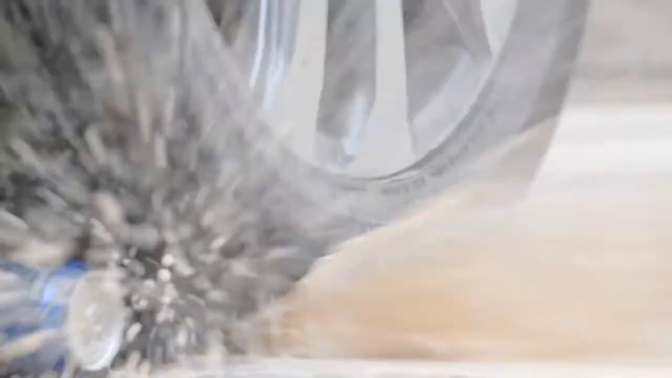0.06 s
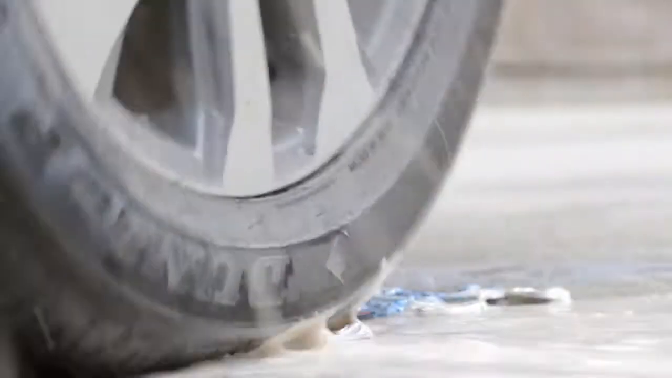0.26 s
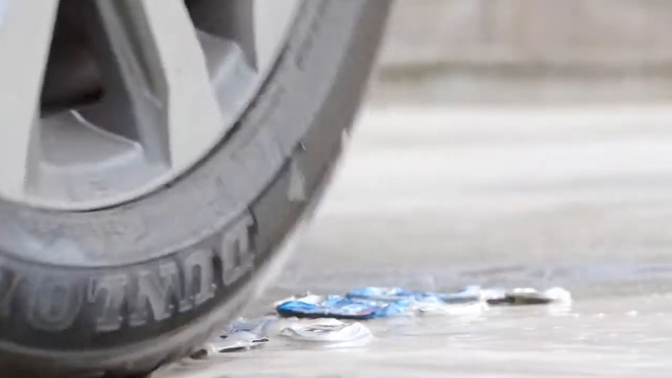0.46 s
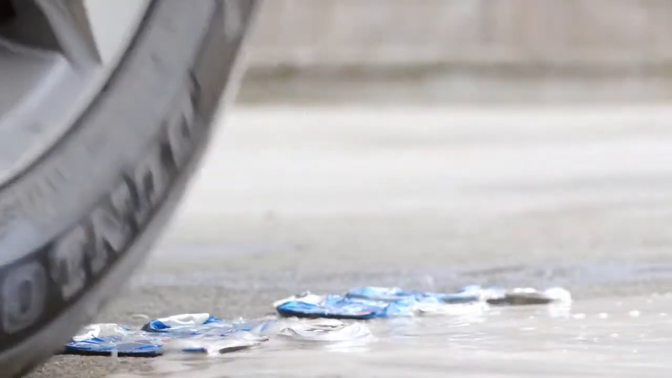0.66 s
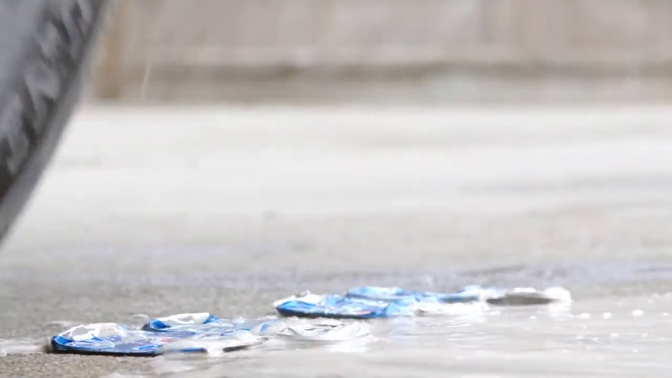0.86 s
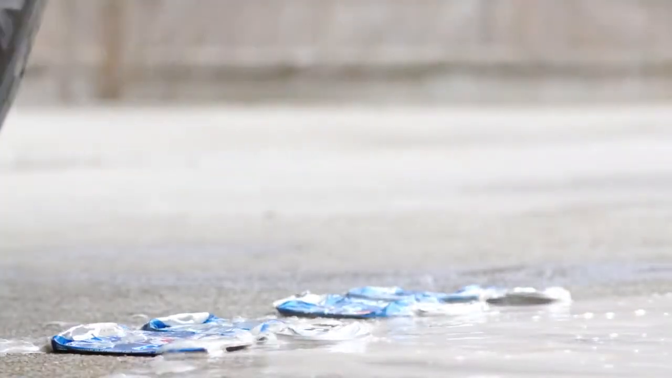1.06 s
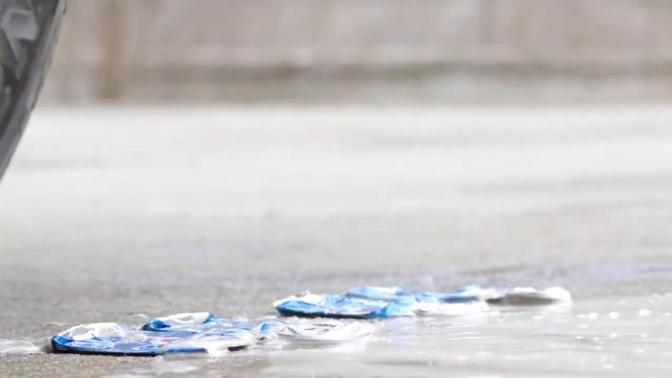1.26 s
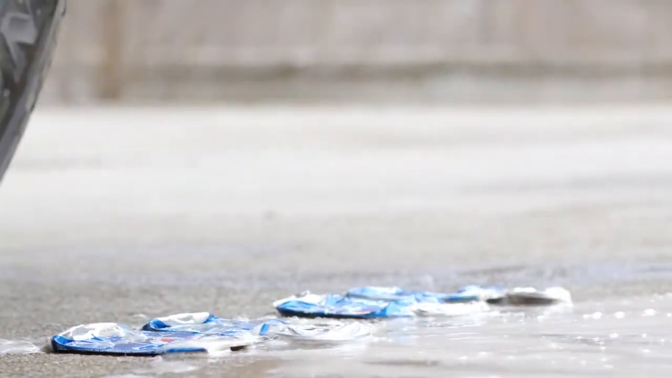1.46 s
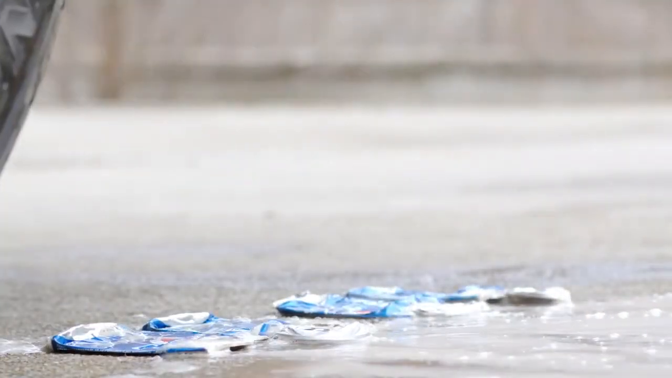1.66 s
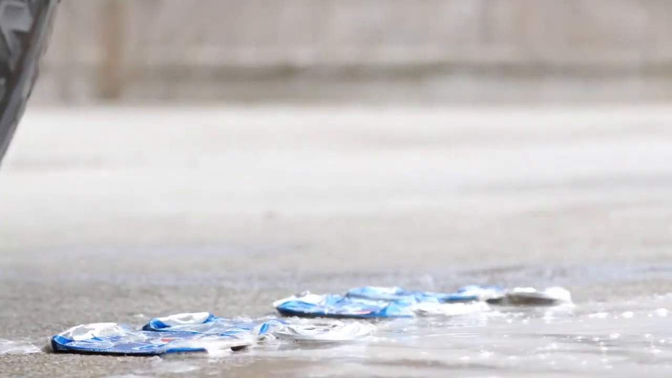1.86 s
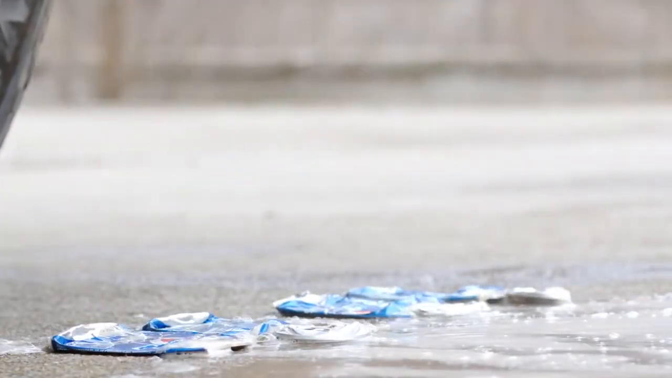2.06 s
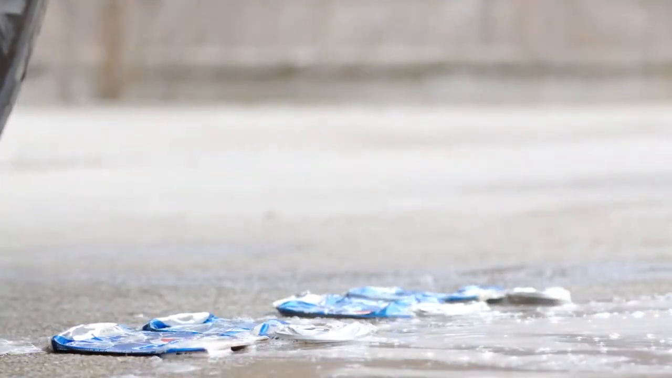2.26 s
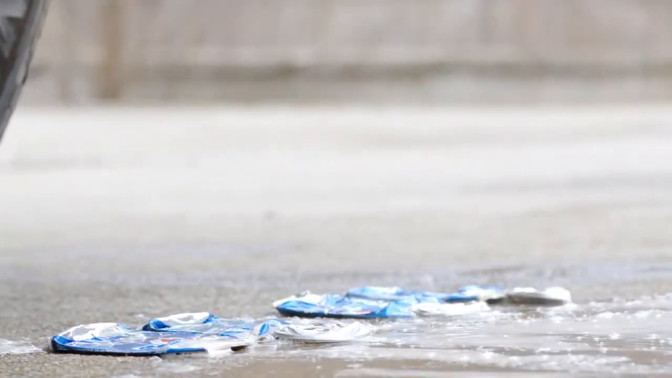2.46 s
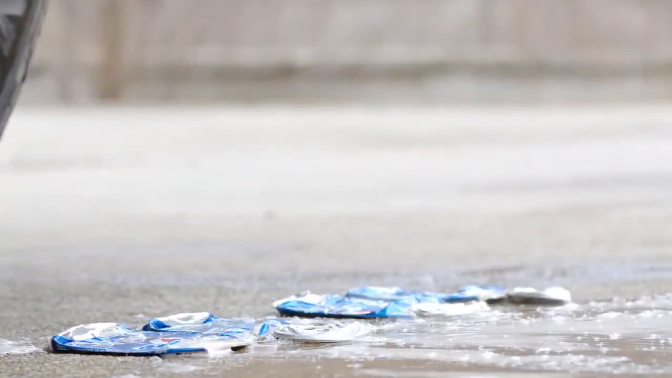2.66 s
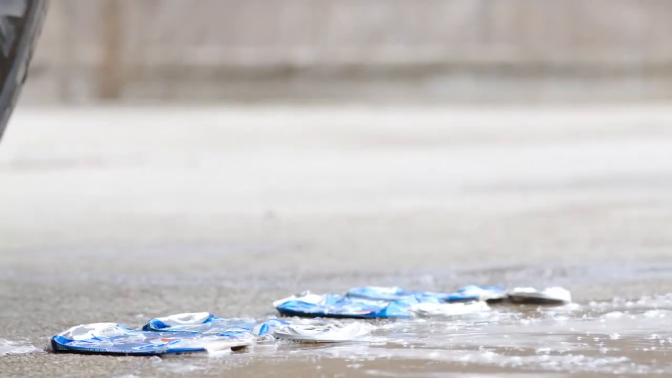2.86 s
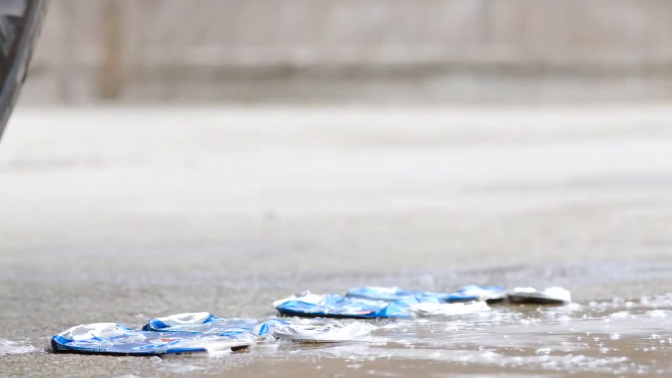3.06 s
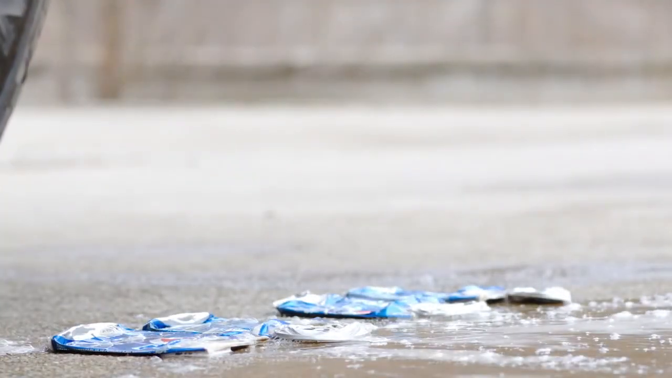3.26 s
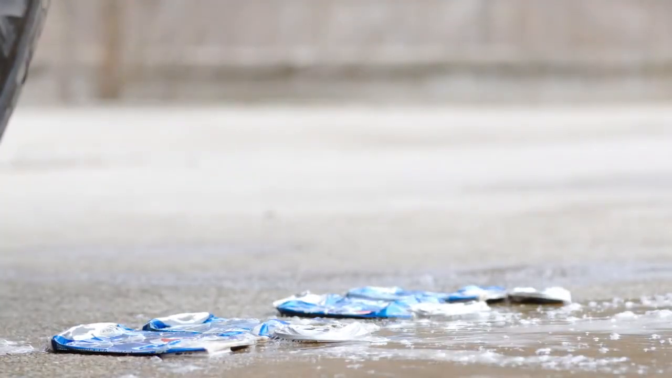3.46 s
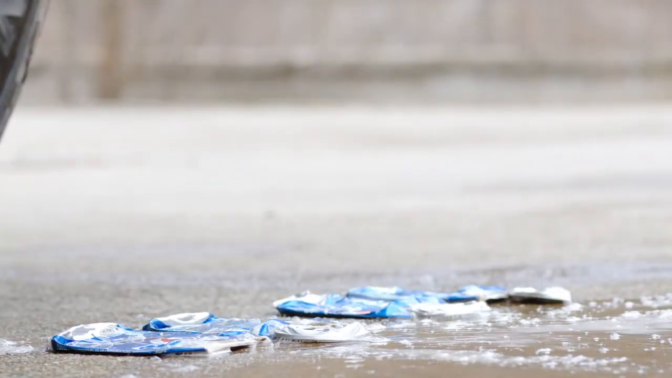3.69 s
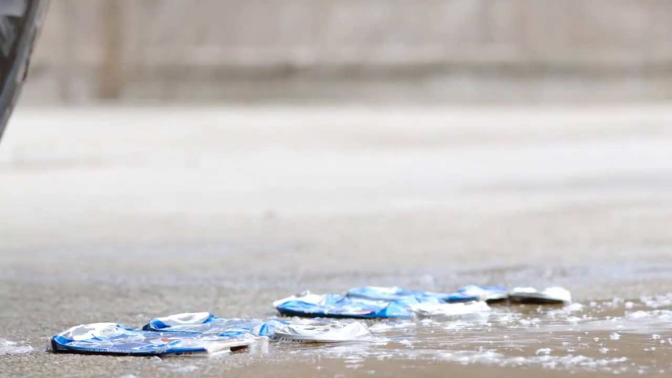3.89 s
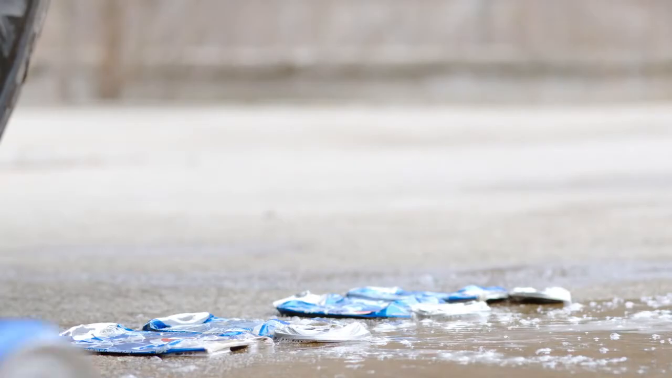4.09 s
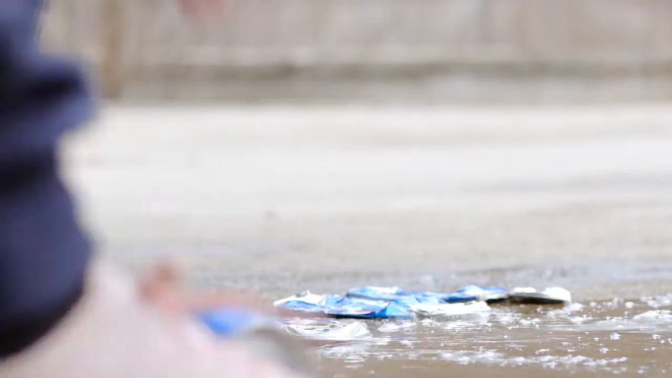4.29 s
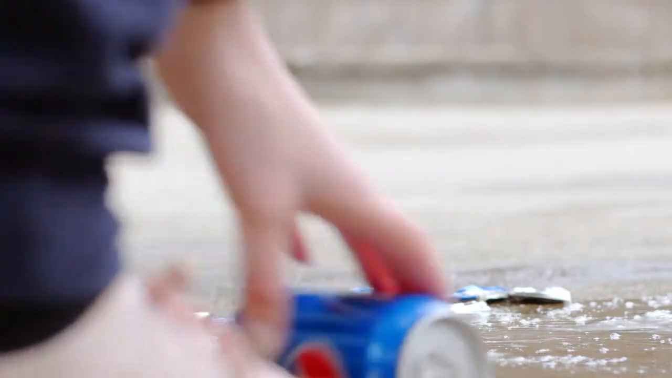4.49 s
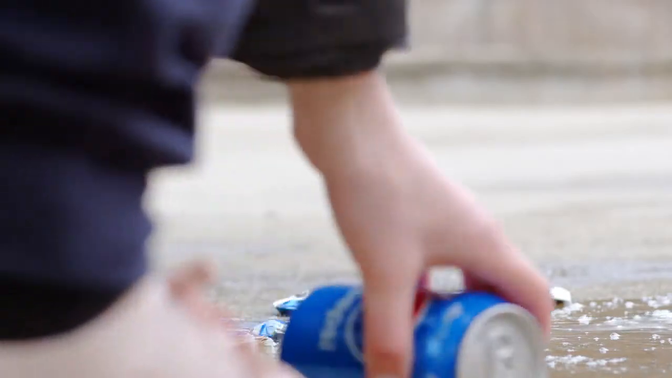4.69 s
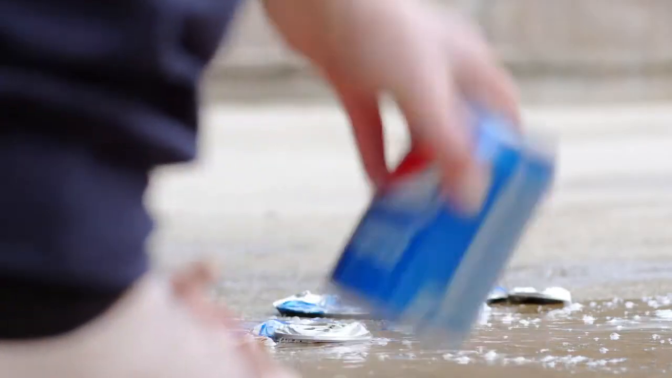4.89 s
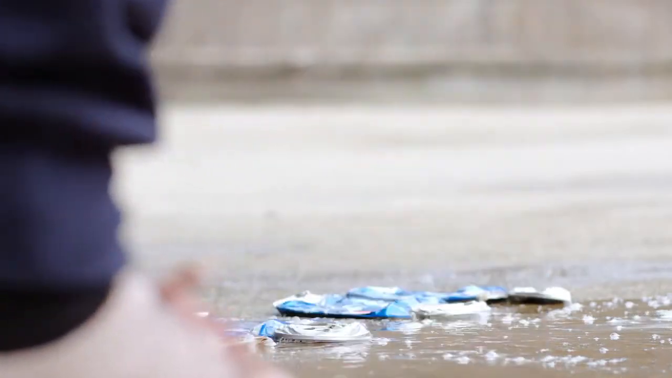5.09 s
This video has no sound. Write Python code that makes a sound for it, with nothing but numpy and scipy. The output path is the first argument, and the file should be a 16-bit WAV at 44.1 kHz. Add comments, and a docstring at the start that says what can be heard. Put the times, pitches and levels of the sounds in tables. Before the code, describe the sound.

Close to the ground in an outdoor yard, a tyre flattens a full soda can right at the start. In the first 0.3 seconds there is a very loud, dry pop with a low thud, rapid metallic snaps and crackles, a spluttering spray and a deep puff of air buffeting the microphone, with short dull echoes. Sparse tinny crinkles continue to about 1.2 seconds, while the tread crunches softly over wet grit until the car stops near 2 seconds. Much quieter underneath, foam fizzes finely and slowly fades, with tiny drops around 2.8 to 4 seconds. A car engine runs throughout, humming low with even knocks, light valve ticks and a thin whine. A faint wavering belt squeal comes and goes from about 3.4 to 4.3 seconds. After 4.25 the engine slows slightly and softens; at about 4.5 a fresh can touches down with a light scrape.

```python
"""Soda can crushed by a car

A tyre rolls over a full can on concrete: decaying sines and noise form its buckles, pop and thud.
Dense random clicks form the spray, the fizzing foam and the grit; a fresh can is set down later.
Filtered noise forms the wind on the microphone and the outdoor air; a wavering sine is the belt.
The eight-cylinder engine sums hum and whine harmonics with noise knocks and ticks, then sags a little."""
import sys
import numpy as np
from scipy import signal
from scipy.fft import rfft, irfft, next_fast_len
from scipy.io import wavfile
from scipy.ndimage import uniform_filter1d

SR = 44100
rng = np.random.default_rng(int(sys.argv[2]) if len(sys.argv) > 2 else 0)


def output_pcm(signal):
    """Save a mono or channel-first signal as 16-bit PCM at the path in sys.argv[1].

    Samples are clipped to [-1, 1] before scaling.
    """
    pcm = np.clip(np.atleast_2d(signal).T, -1, 1) * 32767
    wavfile.write(sys.argv[1], SR, np.round(pcm).astype(np.int16))


N = 226585
TIME = np.arange(N) / SR


def undb(db):
    """Level law: decibels to amplitude gain."""
    return 10 ** (np.asarray(db) / 20)


def unit(x):
    """Normalisation: scale to rms 1."""
    return x / np.sqrt(np.mean(x ** 2))


def colour(x, points):
    """Minimum-phase filtering: a causal filter of unit mean power gain shaped by (frequency [Hz], level [dB])."""
    size = next_fast_len(2 * N)
    size += size % 2
    hz, db = np.transpose(points)
    log_hz = np.log(np.maximum(np.arange(size // 2 + 1) * SR / size, 1))
    below = np.maximum(np.log(hz[0]) - log_hz, 0)
    above = np.maximum(log_hz - np.log(hz[-1]), 0)
    level_db = np.interp(log_hz, np.log(hz), db) - 20 * (below + above)
    # folding the cepstrum onto positive time makes the filter causal
    cepstrum = irfft(np.log(unit(undb(level_db))))
    cepstrum[1:size // 2] *= 2
    cepstrum[size // 2 + 1:] = 0
    return irfft(rfft(x, size) * np.exp(rfft(cepstrum)))[:N]


def add(track, s, sound):
    """Superposition: mix a sound into a track at time s."""
    start = int(np.clip(s * SR, 0, N))
    track[start:start + len(sound)] += sound[:N - start]


def fade(t60, size=8192):
    """Exponential damping: the amplitude falls 60 dB in t60 seconds."""
    return np.exp(-np.log(1000) * TIME[:size] / max(t60, 1e-3))


def hold(until, t60):
    """Delayed damping: gain 1 until the given time, then exponential decay."""
    return np.exp(-np.log(1000) * np.maximum(TIME - until, 0) / t60)


def swell(s, rise, t60):
    """Exponential growth and decay: gain climbs 60 dB in rise seconds to 1 at time s, then dies away."""
    return undb(-60 * np.maximum((s - TIME) / rise, (TIME - s) / t60))


def swells(rows, rise, t60):
    """Power addition: joint gain of (time [s], level [dB]) events that share one shape."""
    return np.sqrt(sum((undb(db) * swell(s, rise, t60)) ** 2 for s, db in rows))


def walk(rate):
    """Smoothed randomness: a slow fluctuation of rms near 1."""
    hold_samples = int(SR / rate)
    steps = np.repeat(rng.standard_normal(N // hold_samples + 1), hold_samples)
    return unit(uniform_filter1d(steps, hold_samples)[:N])


def grains(rate, spread_db):
    """Shot noise: random clicks of uneven size and either sign, rms 1."""
    size = undb(spread_db * np.minimum(rng.standard_normal(N), 2))
    present = rng.random(N) < rate / SR
    return unit(present * size * rng.choice([-1, 1], N))


# larger buckles of the can:
# (time [s], level [dB], panel frequency [Hz], cycles to decay 60 dB, relative bright snap level [dB])
BUCKLES = [(0.0388, -13.5, 1410, 2.4, 6.5), (0.0404, -5, 2540, 2.7, -4), (0.0453, -14, 1910, 8.3, -1),
           (0.0606, -8.5, 800, 10, -15), (0.0645, -12, 920, 8.3, -10), (0.069, -8, 1010, 2.5, -7),
           (0.116, -27, 2100, 11, -10), (0.1223, -14.5, 1450, 15, -14), (0.1335, -8, 1510, 6.1, -5.5),
           (0.1358, -17.5, 2500, 16, -3.5), (0.1386, -25, 1490, 29, -16), (0.146, -26, 1530, 47, -6),
           (0.17, -17.5, 1330, 8.7, -25), (0.2155, -24.5, 3730, 7, -1), (0.225, -26, 1690, 12, -20),
           (0.2724, -31, 1480, 5, -3.5), (0.2813, -26, 740, 9, -10.5), (0.2996, -30.5, 1910, 9.7, -1.5),
           (0.3391, -24.5, 3160, 12, -1.5), (0.439, -23.5, 1590, 5.1, -6), (0.4588, -25.5, 970, 3, -19),
           (0.477, -28.5, 3000, 3.2, 0), (0.4823, -27, 1470, 15, -5), (0.5265, -40, 770, 6.5, -25),
           (0.602, -41.5, 1846, 91, -6), (0.6613, -32.5, 1000, 1.6, -3), (0.8078, -22, 980, 5, -30),
           (0.815, -39, 1180, 31, -5), (0.8347, -37, 1370, 14, -16), (1.2068, -34, 820, 5, -16)]
# spectrum of the torn sheet: (frequency [Hz], level [dB])
SHEET_COLOUR = [(210, -33), (350, -11), (786, -5), (1230, -13), (1850, -8.5), (2540, -15), (2890, -15),
                (4090, -22.5), (5530, -27), (8220, -38), (9330, -44.5), (11100, -43), (15500, -46)]
# ringing of the can: (frequency [Hz], relative level [dB], decay t60 [s])
CAN_MODES = [(607, -9, .35), (631, 7, 0.3), (704, -4.5, 0.25), (817, -18, 0.32), (837, -2, 0.2),
             (900, -11, 0.15), (1034, -1, 0.23), (1035, 0.5, 0.55), (1313, 12, 0.12), (1427, 0, 0.29),
             (1670, 2, 0.21), (2160, -8, .18), (2954, -3, 0.14)]
SNAP_T60_S = .016
# countless small creases while the tread flattens the can
CRUSH_S, CREASE_DB, CREASES_PER_S, CREASE_T60_S = 0.084, -35.5, 1100, 0.67


def can(panel_db=0.0, panel_low_hz=520, rattle_db=-26, rattle_t60=0.12, snap_level_db=-3,
        modes_db=-39.0, crease_rise=0.29):
    """Snap-through buckling: each panel flips, snaps and excites sheet rattle and modes; creases crackle."""
    panels, snaps, rings = np.zeros((3, N))
    modes = np.array([undb(db) * np.sin(2 * np.pi * hz * TIME[:SR]) * fade(t60, size=SR)
                      for hz, db, t60 in CAN_MODES])
    for s, db, hz, cycles, snap_db in BUCKLES:
        noise = rng.standard_normal(8192)
        flip = np.sin(2 * np.pi * hz * TIME[:len(noise)]) * fade(cycles / hz)
        add(panels, s, undb(db + panel_db) * flip)
        snap_and_rattle = undb(snap_db) * fade(SNAP_T60_S) + undb(rattle_db) * fade(rattle_t60)
        add(snaps, s, undb(db) * noise * snap_and_rattle)
        # every buckle strikes another spot, so the modes start with other signs
        signs = rng.choice([-1., 1.], len(modes))
        add(rings, s, undb(db + modes_db) * signs @ modes)
    creases = grains(CREASES_PER_S, spread_db=6) * undb(CREASE_DB)
    creases = creases * swell(CRUSH_S, crease_rise, CREASE_T60_S)
    # a small panel radiates little bass
    high_pass = signal.butter(2, panel_low_hz, "high", fs=SR, output="sos")
    panels = signal.sosfilt(high_pass, panels)
    return panels + colour(undb(snap_level_db) * snaps + creases, SHEET_COLOUR) + rings


def burst(s=.0364, pop_hz=400, pop_t60=0.013, pop_db=-8, thud_hz=90, thud_t60=0.096, thud_db=-16.5,
          tyre_hz=179, tyre_t60=1.15, tyre_db=-34):
    """Impulsive excitation: the wall pops, the wheel drops with a thud and rings the tyre's air cavity."""
    out = np.zeros(N)
    for hz, t60, db in [(pop_hz, pop_t60, pop_db), (thud_hz, thud_t60, thud_db), (tyre_hz, tyre_t60, tyre_db)]:
        add(out, s, undb(db) * np.sin(2 * np.pi * hz * TIME) * fade(t60, size=N))
    return out


# spurts of soda as the can is squeezed: (time [s], level [dB])
SPURTS = [(0.002, -32.5), (0.048, -38.5), (0.098, -37.5), (0.17, -37.5), (0.205, -46)]
# spectrum of the spray: (frequency [Hz], level [dB])
JET_COLOUR = [(210, -20), (350, -4), (639, -1.5), (1510, -9.5), (2620, -10), (2980, -8.5), (4030, -16),
              (6380, -18.5), (7010, -19.5), (15500, -25.5)]
# spectrum of the fizz: (frequency [Hz], level [dB])
FOAM_COLOUR = [(1000, 3.5), (2500, 1.5), (4500, 3), (7000, -0.5), (10000, -4), (14000, -5), (16000, -11)]
# larger bubbles and drops: (time [s], relative level [dB])
DROPS = [(2.81, -57), (3.1747, -54.5), (3.488, -60), (3.9894, -58), (4.0334, -63), (4.618, -63)]
SPURT_RISE_S, SPURT_T60_S = 0.14, 0.14
MIST_S, MIST_DB, MIST_T60_S = 0.12, -54, 2  # the spray rains back down
# the foam fizzes evenly, then dies down to a last faint prickle
FOAM_DB, FOAM_HOLD_S, FOAM_T60_S, PRICKLE_DB = -65, 1.94, 8.8, -81


def soda(drop_t60=0.1, drop_db=-9, mist_rise=.4, splutter_db=1.5):
    """Shot noise of a liquid: a spluttering jet of droplets, then countless bubbles popping in the foam."""
    mist = undb(MIST_DB) * swell(MIST_S, mist_rise, MIST_T60_S)
    flow = np.hypot(swells(SPURTS, SPURT_RISE_S, SPURT_T60_S), mist)
    jet = colour(grains(9000, 1.1), JET_COLOUR) * flow * undb(splutter_db * walk(150))
    fizz = np.hypot(undb(FOAM_DB) * hold(FOAM_HOLD_S, FOAM_T60_S), undb(PRICKLE_DB))
    foam = colour(grains(14000, 2.4), FOAM_COLOUR) * fizz
    drops = np.zeros(N)
    for s, db in DROPS:
        shape = fade(drop_t60)
        add(drops, s, undb(db + drop_db) * shape * rng.standard_normal(len(shape)))
    return jet + foam + colour(drops, FOAM_COLOUR)


def yard(x, wet_db=-19, t60=0.45, delay=0.009):
    """Diffuse reflection: dull scattered echoes from the car body and a wall."""
    echo = np.zeros(N)
    add(echo, delay, fade(t60, size=SR) * rng.standard_normal(SR))
    echo = colour(echo, [(200, 8.0), (1500, -13), (4000, -18), (12000, -9.0)])
    echo = echo / np.sqrt(np.sum(echo ** 2))
    return x + undb(wet_db) * signal.fftconvolve(x, echo)[:N]


def clatter(turn, offset, sizes_db, t60, repeat, scatter_db):
    """Periodic impacts: one per firing; each cylinder's noise ring partly repeats from cycle to cycle."""
    out, shape = np.zeros(N), fade(t60, size=2048)
    own = rng.standard_normal((len(sizes_db), len(shape)))
    repeat = np.clip(repeat, 0, 1)  # share of the power
    for k in range(1, int(turn[-1])):
        cylinder = k % len(sizes_db)
        fresh = rng.standard_normal(len(shape))
        ring = np.sqrt(repeat) * own[cylinder] + np.sqrt(1 - repeat) * fresh
        size = undb(sizes_db[cylinder] + scatter_db * rng.standard_normal())
        add(out, np.interp(k + offset, turn, TIME), size * shape * ring)
    return unit(out)


def lifter(turn, hz=4950, width_hz=560, db=-15, t60=0.5, scatter_db=0.7):
    """Resonance: one loose valve lifter chirps once a cycle, never quite alike."""
    out, shape = np.zeros(N), fade(t60)
    for k in range(1, int(turn[-1]), len(CYLINDERS)):
        size = undb(scatter_db * rng.standard_normal())
        add(out, np.interp(k + 0.32, turn, TIME), size * shape * rng.standard_normal(len(shape)))
    resonator = signal.iirpeak(hz, hz / width_hz, fs=SR)
    once = signal.lfilter(*resonator, out)
    return undb(db) * unit(signal.lfilter(*resonator, once))


# someone crouches between the engine and the microphone and shades its treble
CROUCH_S, CROUCH_LENGTH_S, SHADE_DB = 4.55, 0.38, -2


def shaded(x, edge_hz=760):
    """Diffraction: low notes bend round a body in the way; the treble is partly blocked."""
    low = signal.sosfiltfilt(signal.butter(3, edge_hz, fs=SR, output="sos"), x)
    blocked = np.clip((TIME - CROUCH_S) / CROUCH_LENGTH_S, 0, 1)
    return low + (x - low) * undb(SHADE_DB * blocked)


# exhaust hum: (multiple of the eight-firing cycle, relative rms level [dB])
HUM = [(2, -63.5), (5, -77), (6, -56.5), (8, -54), (13, -71.5), (14, -66), (16, -57.5), (21, -69.5),
       (23, -73.5), (24, -62.5), (25, -76), (26, -72), (46, -73)]
# whine of the accessory drive: (multiple of the eight-firing cycle, level against the knock [dB])
WHINE = [(80, -12.5), (112, -10.5), (120, -24.5), (128, -11)]
# cylinders in firing order: (relative knock level [dB], relative valve tick level [dB])
CYLINDERS = [(3, -2.5), (2.5, 4), (1.5, 1.5), (-1.5, -1.5), (1.5, -2), (0, 0), (0.5, 0), (-5, -1.5)]
# spectrum of the engine block: (frequency [Hz], level [dB])
BLOCK_COLOUR = [(120, -0.5), (220, -13), (280, 2.5), (460, 6.5), (530, -0.5), (660, 5.5), (860, 1),
                (960, -5), (1100, -3), (1350, -11.5), (1850, -5.5), (2050, -45.5), (3200, -19),
                (7000, -45.5)]
# spectrum of the valves: (frequency [Hz], level [dB])
VALVE_COLOUR = [(900, -9), (1550, 2.5), (1880, 8), (2020, -21.5), (2400, 1.5), (2650, -6), (2950, 3.5),
                (3250, -1.5), (3500, -10), (4400, -17), (4700, -8.5), (5050, -14.5), (5450, -16),
                (7000, -18), (10000, -42)]
# gain of each engine part: (at idle [dB], more while pulling [dB], more once sagged [dB])
HUM_GAIN = (-1.34, 1.5, -5)
KNOCK_GAIN = (-58.5, 1.5, -4.5)
TICK_GAIN = (-64, 1, -9.5)
# engine speed (firings a second): pulling the car, idling free, sagging at the end
PULL_HZ, IDLE_HZ, SAGGED_HZ = 46.1, 46.64, 42.8
FREE_S, SAG_S, SAG_LAG_S = .975, 4.25, .3
EASE_T60_S = 5  # the load eases off after pulling


def engine():
    """Harmonic series and impacts locked to the count of firings; louder under load, softer in the sag."""
    sag = 1 - np.exp(-np.maximum(TIME - SAG_S, 0) / SAG_LAG_S)
    speed = np.where(TIME < FREE_S, PULL_HZ, IDLE_HZ) + (SAGGED_HZ - IDLE_HZ) * sag
    turn = .28 + np.cumsum(speed) / SR  # firings so far
    load = hold(FREE_S, EASE_T60_S)
    hum_gain, knock_gain, tick_gain = (undb(idle + pulling * load + sagged * sag ** 3)
                                       for idle, pulling, sagged in (HUM_GAIN, KNOCK_GAIN, TICK_GAIN))
    # the throb peaks on the sixth cylinder
    angle = 2 * np.pi * (turn - 5) / len(CYLINDERS)
    hum = sum(np.sqrt(2) * undb(db + 1.0 * walk(2.46)) * np.cos(round(k) * angle) for k, db in HUM)
    whine = sum(np.sqrt(2) * undb(db + 2.0 * walk(35)) * np.cos(round(k) * angle + 0.59 * walk(5.4))
                for k, db in WHINE)
    knock_db, tick_db = np.transpose(CYLINDERS)
    knocks = clatter(turn, 0.1174, knock_db, t60=0.13, repeat=0.85, scatter_db=0.16)
    knocks = shaded(colour(knocks, BLOCK_COLOUR))
    taps = clatter(turn, .25, tick_db, t60=.15, repeat=.65, scatter_db=.7)
    ticks = shaded(colour(taps, VALVE_COLOUR)) + lifter(turn)
    return hum * hum_gain + (knocks + whine) * knock_gain + ticks * tick_gain


# puffs of air on the microphone: (time [s], level [dB], rise over 60 dB [s], decay t60 [s])
GUSTS = [(0.072, -11, 0.45, 0.43), (0.19, -25.5, 0.33, 0.17), (0.5, -39.5, 3, 1.4), (1.1, -46, 2.3, 1.7),
         (1.4, -37.5, 0.45, 0.78), (4.8, -52, 2.9, 2.2)]
# spectrum of the moving air: (frequency [Hz], level [dB])
GUST_COLOUR = [(6, -8.5), (15, 7.5), (30, -12), (60, -15.5), (120, -22.5), (250, -57), (600, -65)]
BREEZE_DB = -52.5


def wind():
    """Turbulent pressure: the blast and later puffs buffet the microphone over a light breeze."""
    puffs = sum((undb(db) * swell(s, rise, t60)) ** 2 for s, db, rise, t60 in GUSTS)
    power = undb(BREEZE_DB) ** 2 + puffs
    return colour(rng.standard_normal(N), GUST_COLOUR) * np.sqrt(power)


# the tread scrunches over the can and wet grit: (time [s], level [dB])
SCRUNCHES = [(0.07, -44), (0.55, -58.5), (1.02, -55.5), (1.18, -52), (1.68, -55.5)]
# spectrum of the tread on grit: (frequency [Hz], level [dB])
ROLL_COLOUR = [(80, 3), (170, 4.5), (330, 5.5), (700, -5), (1500, -16), (4000, -21)]
SCRUNCH_RISE_S, SCRUNCH_T60_S = 0.43, 0.79
# the tread rolls on until the car stops
ROLL_DB, STOP_S, STOP_T60_S = -64, 1.93, 1.2


def tread():
    """Granular contact: grit crunches dully under the rolling tyre."""
    rolling = undb(ROLL_DB) * hold(STOP_S, STOP_T60_S)
    load = np.hypot(rolling, swells(SCRUNCHES, SCRUNCH_RISE_S, SCRUNCH_T60_S))
    return colour(grains(1500, 12.0), ROLL_COLOUR) * load


def next_can(s=4.456, db=-67, t60=0.09, scrape_db=-62, scrape_t60=0.35):
    """Impact and friction: a fresh can touches down and scuffs lightly on the wet concrete."""
    touch, scrape = np.zeros((2, N))
    add(touch, s, undb(db) * fade(t60, size=N) * grains(5800, 2.5))
    add(scrape, s, undb(scrape_db) * fade(scrape_t60, size=N) * grains(2500, 3))
    touch = colour(touch, [(2800, -2), (15000, -12)])
    return touch + colour(scrape, [(1500, -8), (2800, 0), (3900, -6), (5000, -15), (15000, -30)])


# faint squeals of the belt: (time [s], level [dB])
SQUEALS = [(3.43, -70), (3.88, -66.5), (4.25, -74)]
SQUEAL_RISE_S, SQUEAL_T60_S = 1, 1


def belt(hz=1080, waver_hz=18):
    """Frequency modulation: a thin wavering squeal comes and goes."""
    phase = 2 * np.pi * np.cumsum(hz + waver_hz * walk(90)) / SR
    level = swells(SQUEALS, SQUEAL_RISE_S, SQUEAL_T60_S) * undb(3.9 * walk(23.9))
    return np.sqrt(2) * np.sin(phase) * level


# spectrum of the outdoor background: (frequency [Hz], level [dB])
AIR_COLOUR = [(40, 10), (200, 11), (700, 1.5), (2000, 1), (5000, -19.5), (10000, -64), (15000, -20)]
AIR_DB = -63.5


def background():
    """Stationary noise: steady, coloured outdoor air."""
    return colour(rng.standard_normal(N), AIR_COLOUR) * undb(AIR_DB)


def scene():
    """Superposition: the can and burst with echoes, plus soda, engine, tyre, wind and background."""
    crushed = yard(can() + burst())
    return (crushed + soda() + next_can() + engine() + belt() + tread() + wind() + background())[None]


TOP_HZ = 15750


def record(dry):
    """Saturation and band limiting: the highest peaks are rounded and the top of the spectrum is cut."""
    rounded = .7 * np.tanh(dry / .7)
    low_pass = signal.ellip(10, .2, 80, TOP_HZ, fs=SR, output="sos")
    return signal.sosfilt(low_pass, rounded)


dry = scene()
out = record(dry)
output_pcm(out)
```